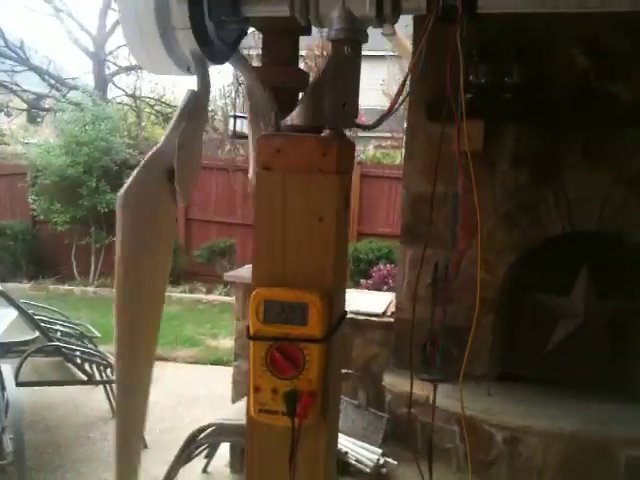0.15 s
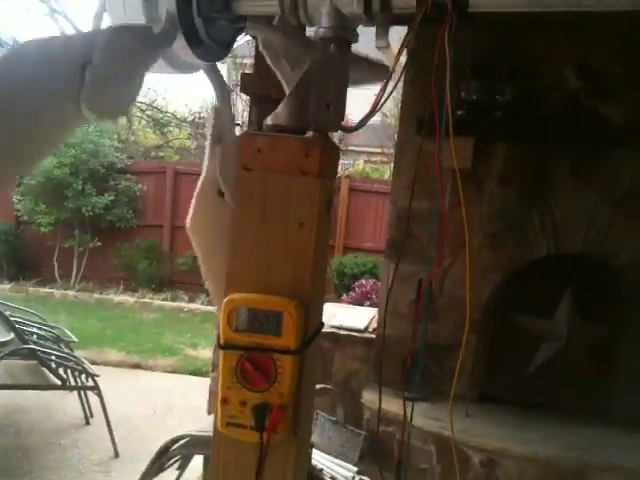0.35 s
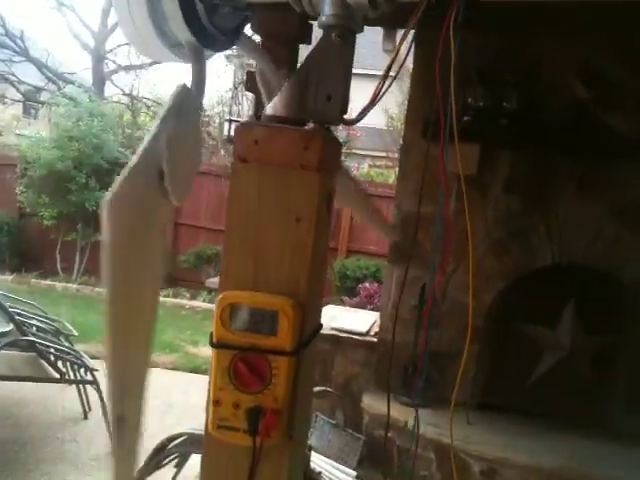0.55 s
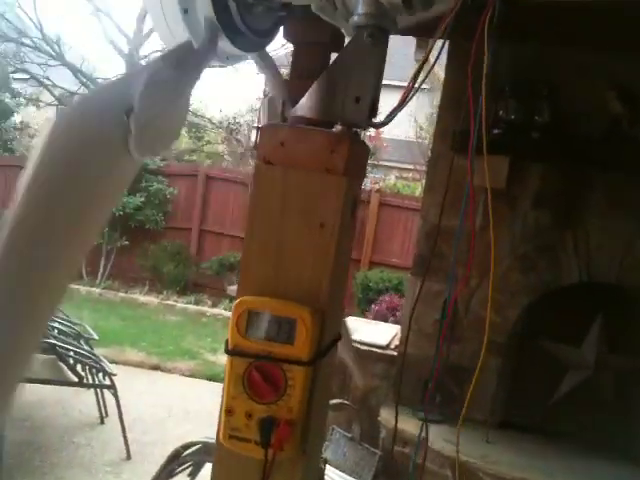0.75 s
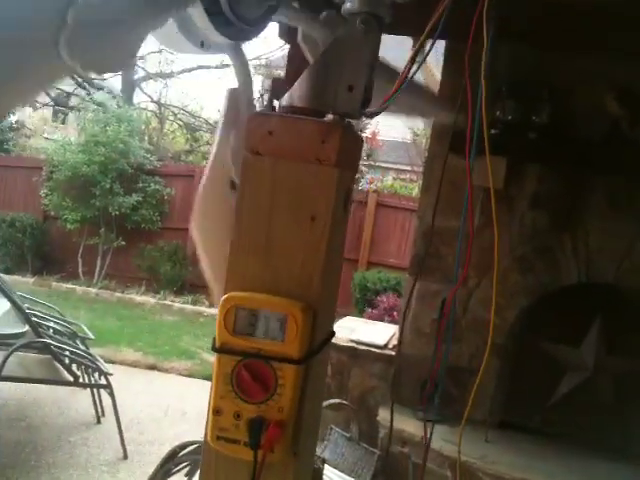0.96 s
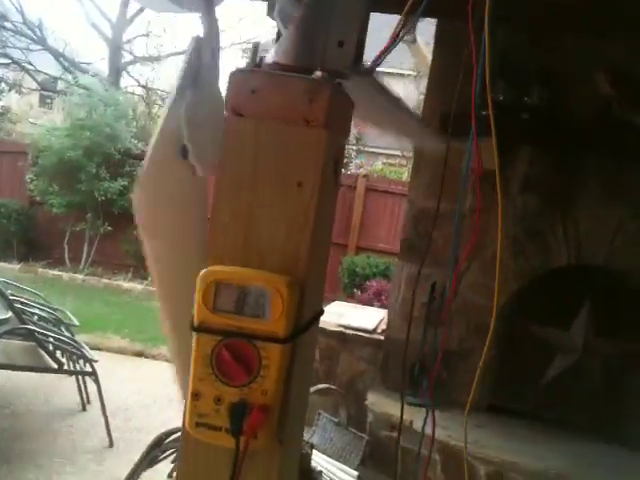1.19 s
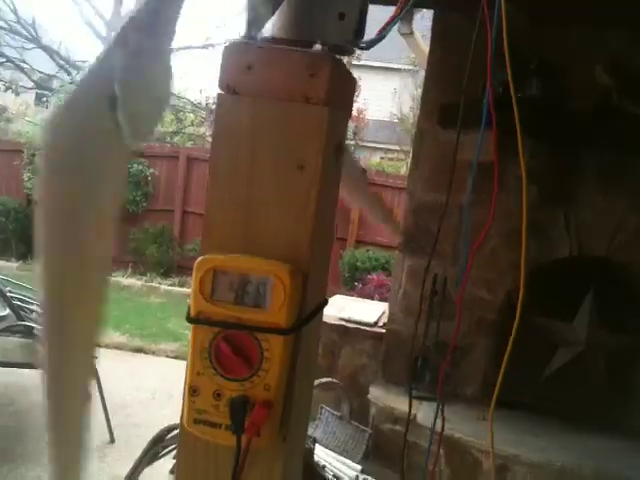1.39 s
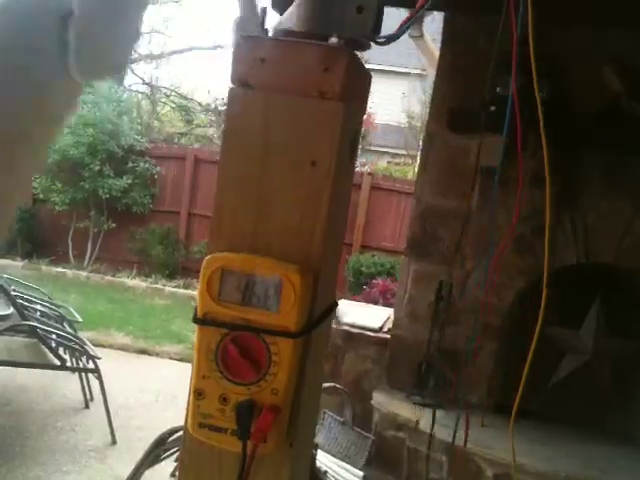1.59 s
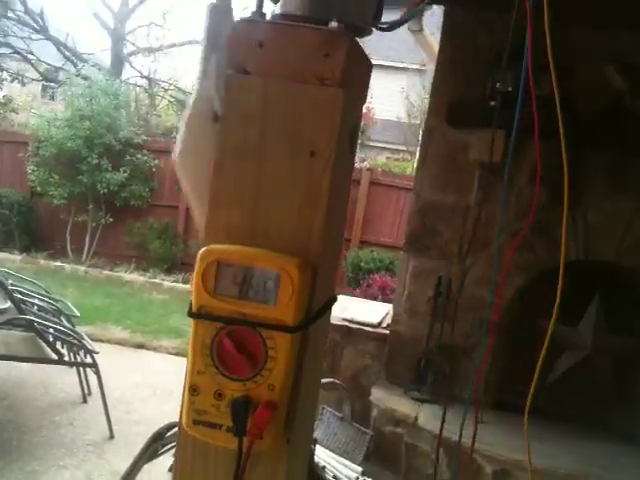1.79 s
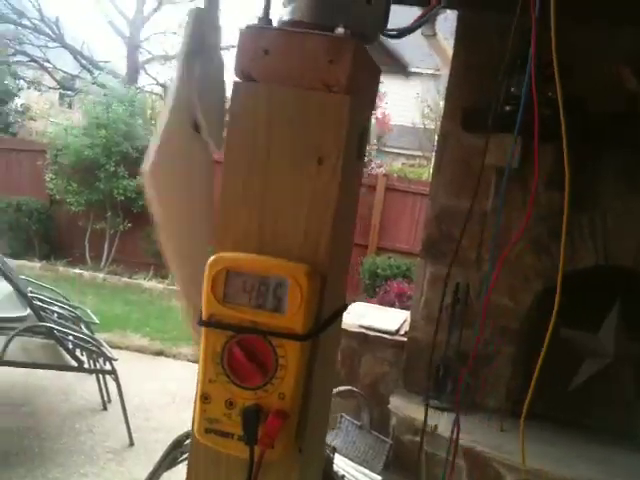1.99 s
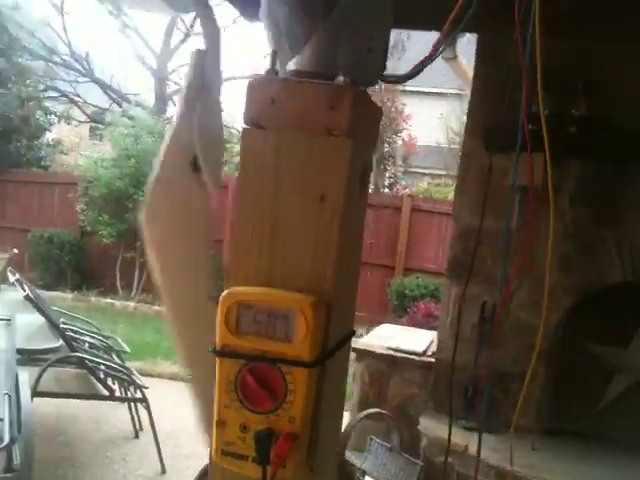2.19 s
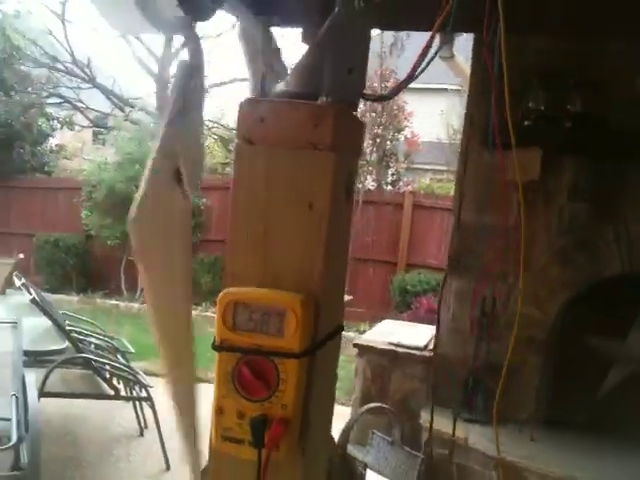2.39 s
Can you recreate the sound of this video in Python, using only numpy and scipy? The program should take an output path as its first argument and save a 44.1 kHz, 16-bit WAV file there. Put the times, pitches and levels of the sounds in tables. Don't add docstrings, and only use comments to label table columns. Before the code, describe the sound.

Low, uneven wind buffeting overloads a close handheld microphone on a covered patio, with a hard early burst, several shorter gusts and quiet gaps; soft air hiss, distant rumble and tiny blade ticks sit far beneath.

```python
import sys
import numpy as np
from scipy import signal
from scipy.io import wavfile
from scipy.ndimage import uniform_filter1d

SR = 44100
rng = np.random.default_rng(int(sys.argv[2]) if len(sys.argv) > 2 else 0)


def level_to_linear(level):
    exponent = np.asarray(level, float) / 20
    return 10 ** exponent


def bounce(signal):
    frames = np.transpose(np.atleast_2d(signal))
    limited = np.clip(frames, -1, 1)
    pcm = np.round(limited * 32767).astype(np.int16)
    wavfile.write(sys.argv[1], SR, pcm)


N = 108045

# f/Hz, density/dB
YARD_SPECTRUM = [(180, -33), (300, -4.5), (617, -12.5), (1800, -12.5), (2790, -17.5), (4770, -18),
                 (6240, -23), (13500, -32.5), (16500, -39)]
# t/s, level/dB
YARD_LEVEL = [(0.0, -55.5), (0.44, -55), (1.4, -58), (2.09, -59.5), (2.45, -58.5)]
# t/s, level/dB
LEAF_LEVEL = [(0, -65), (.5, -66.5), (.75, -67), (1.0, -80), (2.45, -72)]
# f/Hz, level/dB
RUMBLE_SPECTRUM = [(20, -28), (60, 2), (130, -2), (200, -7), (400, -23), (1000, -98)]
# peak t/s, level/dB, rise/s, fall/s, sharpness/dB
GUSTS = [(.06, -28.5, 0.1, 0.061, 5.5), (.138, -26, 0.024, 0.036, 2), (.195, -34, 0.021, .02, 7),
         (0.223, -18, 0.028, 0.05, 4), (0.271, -11, .014, 0.01, 2.5), (0.305, -13, 0.019, 0.016, -4),
         (.287, -11.5, .01, 0.014, 0), (.385, -29, 0.036, 0.039, -3.5), (.435, -28.5, 0.076, 0.032, 0),
         (.575, -41, 0.059, 0.028, 2), (0.618, -28.5, 0.01, 0.015, -13), (.665, -46.5, 0.043, 0.015, -6),
         (.51, -49, 0.017, 0.035, -6), (0.746, -34, 0.022, 0.019, 1), (0.781, -26, 0.018, 0.015, 0.5),
         (0.821, -27.5, 0.02, 0.028, 3), (.87, -29, 0.03, 0.042, 5), (0.928, -21.5, 0.017, 0.043, -0.5),
         (1.003, -36, 0.018, 0.068, -5), (1.099, -41, 0.057, 0.03, 1), (1.166, -26, 0.014, 0.021, -7)]
# peak t/s, level/dB, rise/s, fall/s, sharpness/dB
LATE_GUSTS = [(1.88, -26.5, 0.054, 0.095, 4), (1.198, -17, 0.019, 0.022, -5),
              (1.235, -23, 0.017, 0.017, 2.5), (1.284, -31.5, 0.078, 0.033, -1.5),
              (1.4, -43, 0.055, 0.045, 2.5), (1.545, -38, 0.011, 0.034, -8.5),
              (1.609, -24.5, 0.025, 0.026, 6), (1.642, -14, 0.016, 0.0086, 7.5),
              (1.658, -19, 0.0056, 0.014, -0.5), (1.503, -47, 0.023, 0.018, 2.5),
              (1.719, -29, 0.033, 0.023, -5.5), (1.782, -22.5, 0.031, 0.015, -5),
              (1.836, -19.5, 0.03, 0.01, -8), (1.894, -19.5, 0.033, 0.014, -4.5),
              (1.954, -17, 0.024, 0.02, -4.5), (1.994, -29, 0.056, 0.047, 1.5),
              (2.075, -30.5, 0.018, 0.031, 1), (2.115, -36, 0.023, 0.0078, -10),
              (2.181, -31.5, 0.019, 0.025, 3), (2.214, -30, 0.021, 0.019, 5.5),
              (2.3, -39.5, 0.11, 0.078, 2), (2.386, -21.5, 0.018, 0.02, -7.5),
              (2.356, -37, 0.011, 0.017, -2), (2.421, -26, 0.026, 0.074, -4.5)]
# f/Hz, density/dB
THUMP_SPECTRUM = [(15, -35.5), (25, -39), (151, 7), (248, -3.5), (609, -30), (697, -39), (900, -44.5),
                  (1170, -65), (1980, -120)]
# f/Hz, level/dB
FLAP_SPECTRUM = [(60, -50), (200, 0), (330, 5), (500, -8), (850, -23.5), (1400, -36.5), (3000, -55.5),
                 (6000, -73.5)]
# t/s, peak level/dB, width/ms
POPS = [(0.2386, -10.5, 0.89), (0.2725, -9.5, 0.62), (0.2993, -2, 0.7), (0.3009, -22, 0.22),
        (0.778, -21.5, 0.62), (.9312, -21, 0.82), (.968, -25.5, 1.24), (1.0984, -29, 0.88),
        (1.176, -26, 0.84), (1.23, -18.5, 1.16), (1.645, -17.5, 0.46), (1.619, -18, 1.1),
        (0.2094, -23, 1.3), (1.827, -24.5, 0.88), (1.873, -27.5, 0.62), (1.9124, -19, 0.9),
        (1.946, -20, 0.91), (2.4112, -22, 0.9), (.032, -26, 1.5), (.862, -31, 1.2), (0.89, -35, 0.75)]
# centre t/s, peak level/dB, f/Hz, length/s
BUFFETS = [(0.0435, -27.5, 207, 0.021), (0.068, -19, 251, 0.0041), (0.1436, -21.5, 182.4, 0.012),
           (0.1932, -24.5, 280, 0.0026), (0.2042, -18.5, 229, 0.003), (0.2186, -15.5, 245, 0.0066),
           (0.239, -17, 300, 0.0059), (0.254, -17, 286, 0.004), (0.2643, -7.5, 206, 0.0073),
           (0.2736, -7, 220, 0.006), (0.2855, -20, 284, 0.0023), (0.3858, -20.5, 172, 0.01),
           (0.3937, -20.5, 157, 0.0055), (0.415, -22.9, 203, 0.0096), (0.6202, -25, 204, 0.0067),
           (0.7823, -19.5, 200, 0.0057), (0.8206, -25, 177, 0.017), (0.9216, -21, 209, 0.0048),
           (0.9302, -22, 280, 0.0095), (0.9453, -21.5, 230, 0.0062), (0.9699, -24.0, 196, 0.013),
           (1.1652, -23.0, 152, 0.0074), (1.1908, -16.5, 213, 0.0062), (1.2002, -17, 210, 0.014),
           (1.2271, -16, 178, 0.0063), (1.2452, -15.5, 196, 0.0073), (1.6033, -19, 208, 0.0039),
           (1.627, -11.5, 237, 0.0043), (1.6353, -10.5, 290, 0.011), (1.6567, -16.5, 211, 0.0094),
           (1.7223, -20, 198, 0.006), (1.7738, -25, 190, 0.0051), (1.786, -21.5, 181, 0.029),
           (1.8308, -14.5, 253, 0.0053), (1.8485, -18, 206, 0.015), (1.873, -21, 295, 0.0085),
           (1.8863, -21.2, 227, 0.0024), (1.8932, -18, 188, 0.015), (1.911, -17.5, 278, 0.0048),
           (1.928, -23.5, 207, 0.0089), (1.944, -17.5, 193, 0.0063), (1.961, -17, 233, 0.0039),
           (1.9866, -21.5, 182, 0.023), (2.3855, -21.5, 188, 0.0081), (2.4083, -22.5, 286, 0.0048),
           (2.4287, -20.5, 205, 0.007)]
# centre t/s, peak level/dB, f/Hz, length/s
MORE_BUFFETS = [(.3075, -8, 159, 0.017), (.2778, -6, 206, 0.0046), (1.6415, -13, 370, .006),
                (0.65, -26, 204, .005), (.885, -23, 290, 0.0034), (0.91, -22.5, 156, 0.0078),
                (1.0443, -28, 170, 0.0056), (1.4, -28, 173, 0.0096), (2, -25, 185, 0.0026),
                (1.4, -24.5, 174, 0.0034), (1.2711, -22, 190, 0.0031), (1.7, -25.5, 201, 0.0049),
                (2.1945, -24, 216, 0.0046), (2.2149, -23.5, 208, 0.0061), (0.88, -28, 226, .006),
                (1.6165, -20.5, 413, 0.0094), (1.6445, -16.5, 508, .002), (.9305, -24.5, 387, 0.0037),
                (.6205, -30, 300, .004), (1.638, -10, 295, 0.0068), (.2885, -13.5, 206, 0.0088)]
# t/s, peak level/dB, f/Hz, bandwidth/Hz, decay by 60 dB/s
TICKS = [
    (.2125, -48, 14000, 1620, 0.0115),
    (1.0398, -45, 9050, 3920, 0.011),
    (1.344, -42, 8670, 1800, .025),
    (1.344, -50, 13600, 6000, 0.1),
    (1.346, -53.5, 9000, 3000, .09),
    (1.359, -46, 9000, 2050, .02),
    (1.359, -52, 13500, 4000, .03),
    (2.0786, -52, 9670, 5000, 0.023),
    (1.379, -52, 4490, 1170, 0.048),
]
# start t/s, length/s, f/Hz, level/dB
SQUEALS = [
    (.35, .25, 905, -65),
    (.54, .11, 3615, -68),
    (.5, .2, 2358, -72),
    (1.43, .15, 1790, -71),
]
# centre t/s, half length/s, level/dB
SWISHES = [
    (1.572, .034, -62.5),
    (0.44, .02, -70),
]

LUMP_DB, LUMP_S = 3.5, 0.013
REFERENCE_DB = -30
LULL_DB = -58


def evened(x):
    return x / np.sqrt(np.mean(x ** 2) + 1e-20)


def colour(x, points):
    hz = np.abs(np.fft.fftfreq(8192, 1 / SR))
    f, db = np.transpose(points)
    gain_db = np.interp(np.log(hz + 1), np.log(f + 1), db)
    log_gain = np.log(level_to_linear(np.maximum(gain_db, -100)))
    taps = np.fft.ifft(np.exp(np.conj(signal.hilbert(log_gain)))).real[:4096]
    return signal.oaconvolve(x, taps)[:len(x)]


def resonate(x, hz, width_hz):
    turn = np.exp(2j * np.pi * hz * np.arange(len(x)) / SR)
    r = np.exp(-np.pi * width_hz / SR)
    once = signal.lfilter([1 - r], [1, -r], x / turn)
    twice = signal.lfilter([1 - r], [1, -r], once)
    return 2 * (turn * twice).real


def curve(points):
    return np.interp(np.arange(N) / SR, *np.transpose(points))


def add(mix, s, sound):
    part = mix[round(s * SR):][:len(sound)]
    part += sound[:len(part)]


def lumps():
    width = max(round(LUMP_S * SR), 1)
    smooth = uniform_filter1d(uniform_filter1d(rng.standard_normal(N), width), width)
    return LUMP_DB * evened(smooth)


def yard():
    hiss_db, patch_db = 4.5, 1.5
    z = signal.stft(colour(rng.standard_normal(N), YARD_SPECTRUM), nperseg=1024, noverlap=768)[2]
    patches = uniform_filter1d(rng.standard_normal(z.shape), size=12, axis=0)
    patches = evened(uniform_filter1d(patches, size=16, axis=1))
    hiss = evened(signal.istft(z * level_to_linear(patch_db * patches), nperseg=1024, noverlap=768)[1][:N])
    leaves = evened(resonate(rng.standard_normal(N), hz=6860, width_hz=3500))
    return level_to_linear(hiss_db + curve(YARD_LEVEL)) * hiss + level_to_linear(curve(LEAF_LEVEL)) * leaves


def rumble():
    level_db = -59
    return level_to_linear(level_db + lumps()) * evened(colour(rng.standard_normal(N), RUMBLE_SPECTRUM))


def eddies():
    rate_per_s, spread_db = 2500, 1.5
    size = level_to_linear(spread_db * np.minimum(rng.exponential(1, N), 4)) * rng.standard_normal(N)
    return size * (rng.random(N) < rate_per_s / SR)


def steady(x):
    power = uniform_filter1d(uniform_filter1d(x ** 2, size=450), size=450)
    return x / np.sqrt(power + 0.016 * np.mean(x ** 2))


def wind():
    edge_db, edge_shape = -9, 2.4
    thump_slope, flap_slope, flap_db = 1, 1.395, -12
    t = np.arange(N) / SR
    slow = fast = level_to_linear(LULL_DB) ** 2
    for s, db, rise, fall, sharp_db in [*GUSTS, *LATE_GUSTS]:
        distance = abs(t - s) / np.where(t < s, rise, fall)
        power = level_to_linear(db + edge_db * distance ** edge_shape) ** 2
        slow = slow + power / level_to_linear(sharp_db)
        fast = fast + power * level_to_linear(sharp_db) ** 2
    slow_db = 10 * np.log10(slow) - REFERENCE_DB
    fast_db = 10 * np.log10(fast) - REFERENCE_DB
    thump_level = level_to_linear(REFERENCE_DB + thump_slope * slow_db + lumps())
    flap_level = level_to_linear(REFERENCE_DB + flap_db + flap_slope * fast_db + lumps())
    thump = steady(colour(eddies(), THUMP_SPECTRUM)) * thump_level
    flap = steady(colour(eddies(), FLAP_SPECTRUM)) * flap_level
    return thump + flap


def hush():
    depth_db, span_s = -9, .004
    t = np.arange(N) / SR
    return level_to_linear(sum(depth_db * np.exp(-((t - s) / span_s) ** 2) for s, db, ms in POPS if ms > .3))


def pops():
    out, t = np.zeros(N), np.arange(-400, 1200) / SR
    leak = signal.butter(3, 84, "high", fs=SR, output="sos")
    for s, db, ms in POPS:
        shape = np.hanning(len(t)) ** .5 / (1 + (1000 * t / ms) ** 2) ** 2
        bump = signal.sosfilt(leak, shape)
        add(out, s - 400 / SR, level_to_linear(db) * bump / bump.max())
    return out


def buffets(churn):
    spread, least_s, pitch_bend = 0.39, 0.0017, 0.13
    depth_db, reach, top_hz = -16, 2.4, 520
    rows = [*BUFFETS, *MORE_BUFFETS]
    t, out, hush_db = np.arange(N) / SR, np.zeros(N), np.zeros(N)
    for (s, db, hz, length), (turn, bend) in zip(rows, rng.random((len(rows), 2))):
        span = spread * length + least_s
        u = np.clip((t - s) / span, -6, 6)
        cycles = turn + hz * span * (u + pitch_bend * (bend - .5) * u ** 2)
        out += level_to_linear(db) * np.exp(-u ** 2) * np.cos(2 * np.pi * cycles)
        hush_db = np.minimum(hush_db, depth_db * np.exp(-(u / reach) ** 4))
    low = signal.sosfiltfilt(signal.butter(2, top_hz, fs=SR, output="sos"), churn)
    return churn - low * (1 - level_to_linear(hush_db)) + out


def turbine():
    out, t = np.zeros(N), np.arange(N) / SR
    for s, db, hz, width_hz, t60 in TICKS:
        burst = evened(resonate(rng.standard_normal(3000), hz, width_hz)) / 2
        add(out, s, burst * level_to_linear(db - 60 * t[:3000] / t60))
    for s, length, hz, db in SQUEALS:
        u = np.clip((t - s) / length, 0, 1)
        swell = np.sqrt(2 * np.sin(np.pi * u) + 1e-12) * (u < 1) * (u > 0)
        out += level_to_linear(db) * swell * evened(resonate(rng.standard_normal(N), hz, width_hz=20))
    air = evened(resonate(rng.standard_normal(N), hz=9000, width_hz=11000))
    return out + air * sum(level_to_linear(db - 5.4 * ((t - s) / half) ** 2) for s, half, db in SWISHES)


def scene():
    bass_cut = signal.butter(4, 84, "high", fs=SR, output="sos")
    sub_cut = signal.butter(2, 95, "high", fs=SR, output="sos")
    behind = yard() + rumble() + turbine()
    churn = signal.sosfilt(bass_cut, wind() * hush())
    near = signal.sosfiltfilt(sub_cut, buffets(churn) + pops())
    return (near + behind)[None]


def starve(x):
    from_db, chance_per_db, from_hz, drop_db = -27, .025, 9000, -14
    hz, t, z = signal.stft(x, SR, nperseg=1024, noverlap=512)
    level_db = 10 * np.log10(2 * (abs(z) ** 2).sum(0) + 1e-12)
    chance = np.clip(chance_per_db * (level_db - from_db), 0, 1) * (hz > from_hz)[:, None]
    draws = rng.random((len(t), len(hz) // 8 + 1)).T
    lost = np.repeat(draws, 8, axis=0)[:len(hz)] < chance
    return signal.istft(z * level_to_linear(drop_db * lost), SR, nperseg=1024, noverlap=512)[1][:N]


def band_limit(x):
    return signal.sosfilt(signal.butter(12, 17100, fs=SR, output="sos"), x)


def record(dry):
    low_pass = signal.firwin(255, 17250, fs=SR)
    mix = signal.oaconvolve(starve(dry[0])[None], low_pass[None], "same")
    return band_limit(mix)


dry = scene()
out = record(dry)
bounce(out)
```